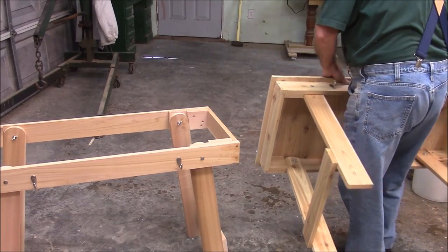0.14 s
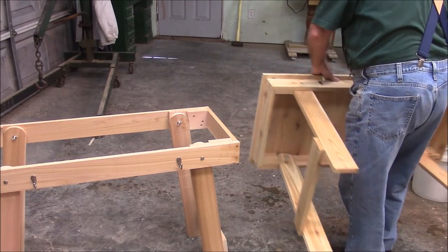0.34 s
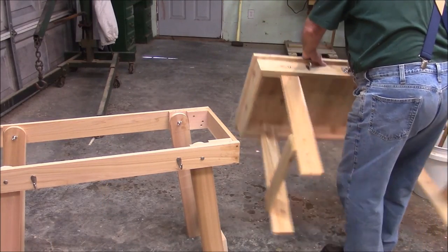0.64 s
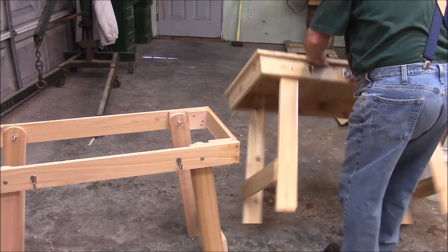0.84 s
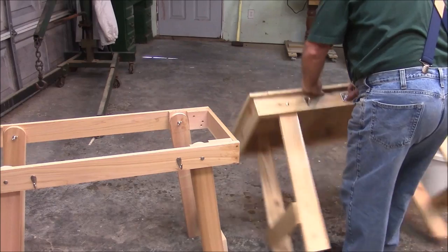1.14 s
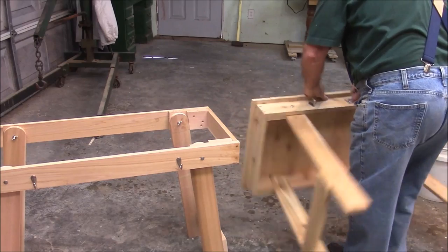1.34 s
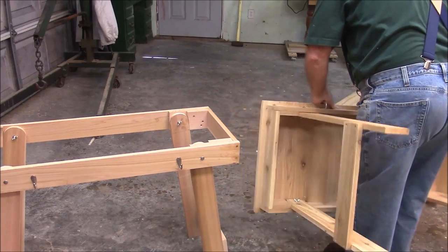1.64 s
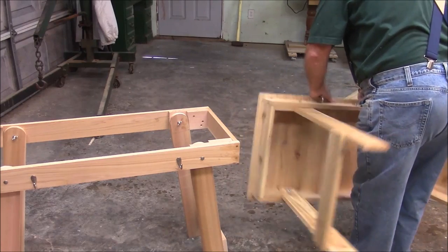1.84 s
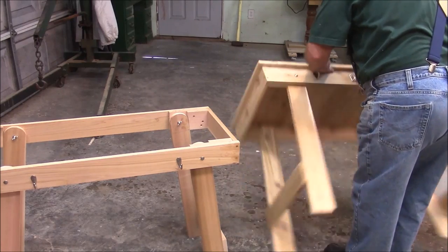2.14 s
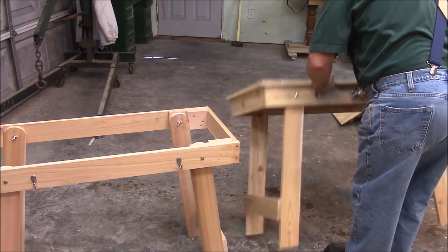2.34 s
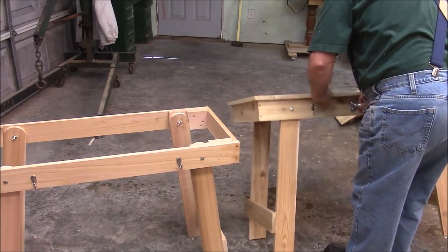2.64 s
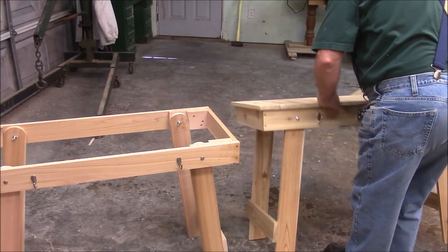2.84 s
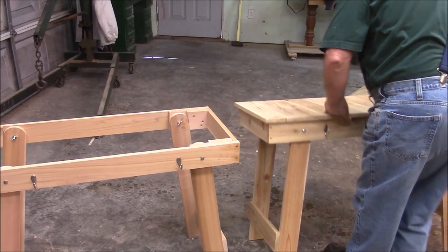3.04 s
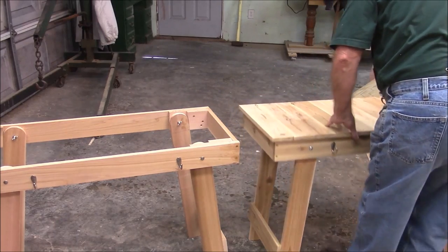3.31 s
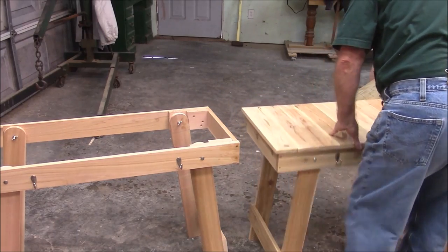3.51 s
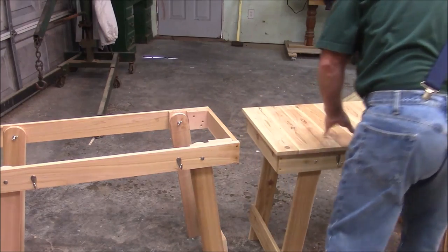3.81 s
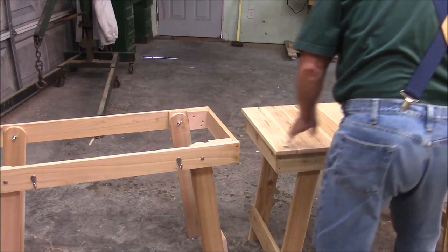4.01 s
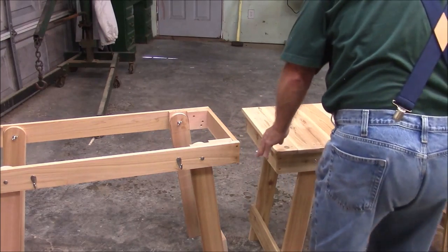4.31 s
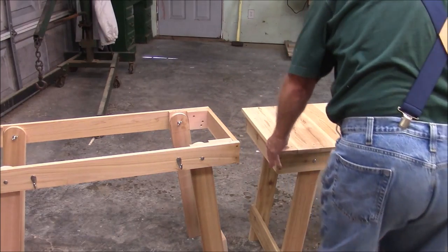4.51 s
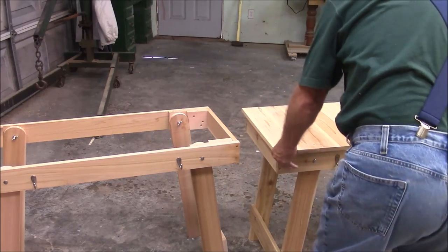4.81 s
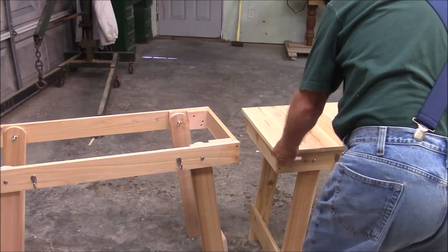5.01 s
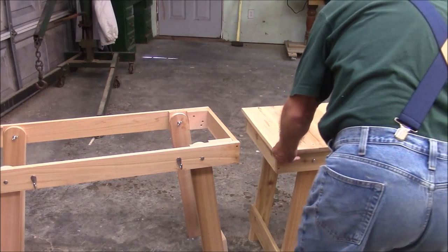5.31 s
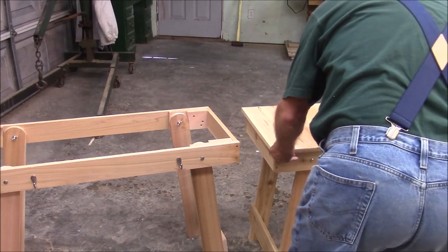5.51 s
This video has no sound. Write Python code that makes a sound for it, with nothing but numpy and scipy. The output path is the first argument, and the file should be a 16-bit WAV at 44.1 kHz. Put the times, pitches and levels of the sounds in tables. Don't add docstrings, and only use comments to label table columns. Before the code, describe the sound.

A low, broad fan drone with a faint unsteady hum runs throughout. In the first 0.4 seconds there are very faint dry hinge squeaks and shoe scuffs. At about 0.86 a wooden brace slaps hard, followed by a quick rattling clatter with hollow board tones until about 1.1. Soft gritty sole scrapes follow around 1.2. At 2.3 to 2.6 comes a louder double clatter: sharp cracks, ringing boards, a bright latch tick and faint hook jingle. After light scuffs, the feet land at 3.5 with a knock and hollow thumps, rocking duller until about 4.2. Gritty shoe strokes rise near 4.2 to 4.3 with a crisp click, then again near 4.9. A tiny knock at 5.3 precedes juddering, groaning stick-slip leg drag from 5.45 to the end. The workshop gives a short woody reverberation; blows are close and compressed.

```python
import sys
import numpy as np
from scipy import signal
from scipy.fft import rfft, irfft, next_fast_len
from scipy.io import wavfile
from scipy.ndimage import uniform_filter1d, minimum_filter1d, map_coordinates

SR = 44100
rng = np.random.default_rng(int(sys.argv[2]) if len(sys.argv) > 2 else 0)


def level_to_linear(level):
    exponent = np.asarray(level, float) / 20
    return 10 ** exponent


def file_out(sig):
    cols = np.atleast_2d(sig).T
    lim = np.clip(cols, -1, 1)
    pcm = np.round(lim * 32767).astype(np.int16)
    wavfile.write(sys.argv[1], SR, pcm)


N = 249606

# (time [s], peak [dB], boom [dB], crack [dB])
BRACE_SLAPS = [(0.858, -1, -6, -5), (0.865, -6, -22, 5), (0.874, -3.5, -9, -25), (0.887, -3.5, -10, -18),
               (0.901, -10, -14, -17), (0.917, -15, -17, 9), (0.933, -13, -11, -28), (0.958, -9, 0, -12),
               (0.974, -20, -14, -23), (0.997, -12, -18, -22), (1.016, -14.5, -21, 6.5),
               (1.027, -26, -18, -18), (1.08, -38, -23, -24), (1.138, -18, -23, -17), (2.3105, 4, -12, -22),
               (2.318, -2, -15, -17.5), (2.345, -6, -19, -22), (2.375, -8, -10, -31),
               (2.3966, 5.5, -7, -30), (2.452, -0.5, -24, -33), (2.474, -7, -17, -38),
               (2.501, -11, -5, -27), (2.518, -19, 4.5, -21), (2.568, -20, -4, -37), (2.584, -21, -7, -23),
               (2.63, -23, -24, -31), (5.336, -19, -22, -31)]
# (time [s], peak [dB], boom [dB], crack [dB])
LEG_JUDDERS = [
    (5.453, -16, -33, -24),
    (5.487, -15, -3, -21),
    (5.552, -11, -20, 5),
]
# (peak time [s], level [dB], fall [s], boom [dB], crack
# [dB])
JOINT_RATTLES = [(.87, -15, 0.34, 1, 2), (.95, -33, 0.14, -3, -14), (2.33, -13.5, 0.12, 0, 2.5),
                 (2.39, -31, 0.048, 17, -11), (2.44, -24, 0.29, 10, -15), (2.49, -20.5, 0.45, -6, -10),
                 (4.771, -24, 0.13, -9, 2)]
# (time [s], peak [dB], pitch [Hz])
AIR_WHACKS = [(0.8574, -2, 554), (2.3102, 4.5, 480), (2.396, -5, 560), (2.451, -4, 450), (3.523, -3, 430),
              (3.628, -5, 330), (3.911, -7, 260), (4.135, -11, 328), (5.454, -9, 480)]
# (loudest time [s], level [dB], pitch [Hz])
BOARD_NOTES = [(.867, -17, 380), (.872, -27, 128), (0.873, -20, 510), (.88, -12, 206), (.893, -11.5, 356),
               (.903, -14, 419), (0.907, -21, 220), (.926, -18, 297), (.935, -18, 139), (.937, -14.5, 382),
               (.944, -16.5, 222), (.963, -16.5, 390), (.965, -20.5, 139), (.972, -18.5, 502),
               (1.003, -17, 366), (1.023, -18, 198), (1.028, -18, 347), (2.323, -15, 460),
               (2.324, -17.5, 379), (2.34, -21, 600), (2.362, -21, 520), (2.334, -18, 228),
               (2.373, -14.5, 310), (2.378, -15, 123), (2.405, -12.5, 417), (2.41, -19, 204),
               (2.42, -10.5, 137), (2.455, -18, 333), (2.457, -14, 158), (2.459, -13, 482),
               (2.475, -14.5, 386), (2.477, -16.5, 180), (2.479, -18.5, 555), (2.503, -14.5, 429),
               (2.522, -9.5, 126.9), (2.53, -17, 353), (2.545, -19, 202), (2.578, -15.5, 411),
               (2.58, -15, 125), (2.606, -20.5, 415), (2.633, -27, 124), (5.464, -14, 421),
               (5.476, -18, 463), (5.493, -11, 356), (5.514, -17, 423), (5.514, -15.5, 252),
               (5.57, -14.5, 235), (5.575, -19, 407), (5.584, -11, 508), (5.598, -16.5, 330),
               (5.608, -20, 420), (5.635, -14.5, 520), (5.654, -7.5, 410)]
# (loudest time [s], level [dB], pitch [Hz])
RAIL_NOTES = [(0.86, -28, 2370), (0.861, -30, 2185), (0.861, -21, 1760), (0.866, -14, 910),
              (.872, -19, 644), (.88, -19, 790), (0.894, -20, 877), (0.895, -19, 699), (0.914, -16, 680),
              (0.922, -26, 1878), (0.923, -29, 1641), (0.933, -23, 667), (0.969, -21, 666),
              (0.983, -28, 840), (1.02, -21, 785), (2.315, -34, 2400), (2.315, -27, 1485),
              (2.316, -24, 1200), (2.317, -16, 1830), (2.318, -15, 877), (2.354, -27, 1680),
              (2.335, -18, 1050), (2.354, -19, 855), (2.363, -28, 1830), (2.379, -17, 910),
              (2.399, -20, 730), (2.402, -11, 1037), (2.41, -18, 1200), (2.429, -23, 980),
              (2.432, -17, 818), (2.448, -21, 694), (2.453, -24, 855), (2.465, -15, 992),
              (2.487, -24, 1001), (2.515, -24, 861), (2.52, -21, 662), (2.532, -23, 992),
              (2.567, -19.5, 757), (2.644, -21.5, 797), (3.528, -22, 893), (3.53, -10, 348),
              (3.633, -21, 738), (3.644, -13, 397), (3.662, -10, 387), (3.681, -15, 420),
              (3.761, -13.5, 350), (3.805, -15, 376), (3.828, -15, 385), (3.931, -14, 417),
              (3.952, -24, 387), (4.139, -17, 436), (5.465, -23, 717), (5.49, -21, 690), (5.557, -24, 2370),
              (5.558, -25, 1640), (5.579, -27, 1650), (5.581, -23, 1060), (5.585, -20, 695),
              (5.615, -24, 3176), (5.615, -21, 700), (5.644, -26, 2420), (5.651, -27, 760)]
# (time [s], peak [dB], boom [dB], crack [dB], boom pitch [Hz])
FOOT_LANDINGS = [(3.523, -5, -17, -9, 151), (3.531, -13, 4, -29, 110), (3.55, -20, -13, -27, 124),
                 (3.628, -7, -3.5, -33, 130), (3.641, -9, 4, -30, 133), (3.6596, -10, 8, -25, 123),
                 (3.6678, -25, 12.5, -34, 123), (3.6753, -23, 12, -34, 123), (3.6841, -24, 10, -34, 125),
                 (3.754, -9, -8, -37, 86), (3.794, -7.5, -0.5, -33, 125), (3.86, -9, 0, -30, 226),
                 (3.91, -10.5, 3.5, -40, 232.6), (3.929, -9.5, 5.5, -32, 127), (3.944, -18, -1, -32, 130.6),
                 (3.962, -45, 6, -29, 128), (4.004, -33, -21, -26, 191), (4.025, -35, 12, -15, 97),
                 (4.134, -8, -2.5, -4, 192), (4.149, -16, -2, -13, 240), (4.169, -17, 1, 4, 128.5)]
# (time [s], level [dB], upper modes [dB])
LEG_DRAG = [(5.449, -40, -14), (5.456, -10, -18), (5.514, -9, -19.5), (5.538, -29, 3), (5.576, -5, -20),
            (5.622, -15, -10), (5.66, -3, -15.5)]
# (peak time [s], level [dB], rise [s], fall [s])
BRACE_BUZZ = [
    (2.316, -23, 0.0074, 0.067),
    (2.365, -29.5, 0.042, 0.069),
    (2.47, -31.5, 0.063, 0.14),
]
# (time [s], peak [dB], pitch [Hz])
GRIT_TICKS = [(0.7397, -33, 7700), (0.819, -38, 3670), (1.128, -20, 3880), (1.4404, -24, 3900),
              (2.3168, -6, 2970), (2.33, -16, 3740), (2.345, -17, 3080), (2.36, -14, 3180),
              (2.3774, -27, 3480), (2.442, 1, 10370), (2.4447, -8, 8860), (2.436, -20, 9000),
              (2.45, -16, 10700), (2.468, -20, 10100), (3.1283, -31, 3800), (3.793, -21, 6720),
              (4.311, -2.5, 6200), (4.315, -3.5, 6500), (.858, -3, 2000), (.859, -8, 2500),
              (0.917, -12, 4800), (.918, -12, 4050), (5.3374, -27, 2980)]
# (time [s], peak [dB], pitch [Hz])
WOOD_CRACKS = [(0.89, -6, 1800), (0.8593, -16, 4500), (2.3113, 0, 1670), (3.524, -16, 2900),
               (3.525, -14, 1800), (3.659, -30, 1700), (2.4405, -15, 2900), (2.7, -18, 1900),
               (0.9173, -11, 3300), (0.97, -7.5, 4900), (0.964, -11, 2430), (.96, -10, 3900),
               (1.0187, -12, 1800), (2.312, -24, 2760), (2.441, -10, 6200), (4.31, -4, 6400),
               (4.316, -8, 6200), (5.457, -19, 2200), (0.8596, -14, 8700), (0.96, -10, 7200),
               (2.312, -20, 7100), (5.551, -27, 2100)]
# (time [s], peak [dB], pitch [Hz])
LATCH_PINGS = [(0.8596, -8, 3750), (.865, -9, 3830), (.872, -12, 3700), (2.328, -13, 3700),
               (2.36, -16, 1830), (2.442, -10, 4200), (2.5, -10, 4140)]
# (peak time [s], level [dB], rise [s], fall [s], bite [Hz])
SOLE_STROKES = [(.06, -49, .15, 0.33, 4700), (.3, -41, 0.85, 0.076, 5530), (.735, -31.5, 0.1, 0.15, 6060),
                (.821, -38, .02, 0.021, 8000), (.868, -26.5, 0.0089, 0.083, 6970),
                (1.04, -42, .03, .05, 7500), (1.179, -19, 0.042, 0.13, 4730),
                (1.245, -19.5, 0.13, 0.21, 5440), (1.44, -29, 0.13, 0.16, 5300),
                (2.325, -30, .012, 0.12, 6800), (2.455, -32.5, .02, 0.22, 6000),
                (2.898, -22.5, 0.17, 0.21, 5300), (3.03, -41, 0.22, 0.43, 3950),
                (3.35, -35, 0.11, .2, 5900), (3.485, -24.5, 0.15, 0.1, 6400),
                (3.65, -28, 0.094, 0.096, 5760), (3.74, -41.5, .1, 0.33, 5640),
                (4.125, -24.5, 0.11, 0.11, 6700), (4.2, -21, 0.034, .05, 3200),
                (4.228, -12, 0.08, 0.1, 4000), (4.319, -14, 0.12, 0.11, 6200), (4.4, -27, 0.09, 0.13, 5000),
                (4.48, -34.5, .1, 0.16, 4600), (4.78, -38.5, 0.21, .1, 5600),
                (4.82, -22, 0.045, 0.091, 6440), (4.875, -16, 0.12, 0.092, 5600),
                (4.95, -19.5, 0.21, 0.17, 6300), (5.12, -33.5, 0.2, 0.18, 5000),
                (5.55, -28, 0.11, .15, 4200), (5.64, -22, 0.18, 0.33, 3660)]
# (peak time [s], level [dB], rise [s], fall [s])
HOOK_JINGLES = [(2.45, -33, .008, 0.068), (2.57, -42, 0.14, 0.087), (2.65, -46, 0.073, .07),
                (5.15, -44, 0.057, 0.081)]
# (time [s], level [dB], chirp [Hz], chirp level [dB])
HINGE_SQUEAK = [(0, -56, 11400, -12), (.05, -45, 11500, -10), (.17, -44, 12300, -9), (.215, -46, 12050, 3),
                (.24, -42, 12000, -14), (.285, -47, 12500, 2), (.32, -47, 11000, 6), (.348, -45, 10400, -1),
                (.37, -75, 10400, -9)]
# (time [s], level [dB])
FAN_LEVEL = [(0, -25.5), (.8, -26.5), (.95, -24), (1.7, -27.5), (2.25, -26.5), (2.46, -22.5), (3.07, -26),
             (3.5, -27), (4, -27), (4.5, -26), (5.66, -26.5)]
# (time [s], level [dB])
BLADE_LEVEL = [(0, -33), (.85, -32), (1.2, -44), (2.3, -33), (3.2, -36), (5.66, -36)]

# (frequency [Hz], width [Hz], level [dB])
TOP_MODES = [(128.5, 20, -8), (196, 22, -5), (235, 29, -3.5), (255, 36, -7)]
FRAME_MODES = [(310, 37, -2), (399, 58, -1), (500, 98, -1), (571, 123, -7.5), (727, 57, -5.5),
               (922, 89, -5.5), (1017, 69, -4.5), (1280, 330, -14.5)]
SLAT_MODES = [(1300, 490, 8), (1700, 270, 15.5), (2600, 450, 12), (2840, 2300, 4), (3870, 360, -3),
              (5300, 14000, 0), (8050, 9300, 0)]
# (frequency [Hz], width [Hz], level [dB])
STANDING_MODES = [(240, 56, -19), (334, 54, -1.5), (388, 47, 0.5), (450, 60, -4.5), (512, 39, -5.5),
                  (745, 135, -5.5), (940, 200, -7)]
# (frequency [Hz], width [Hz], level [dB])
DRAG_LOW_MODES = [(240, 51, -4), (336, 28, 0), (443, 52, 2), (480, 60, -2.5), (520, 70, 4.5),
                  (600, 90, -5.5)]
DRAG_HIGH_MODES = [(704, 96, 1), (1080, 170, -8), (1227, 120, -3), (1690, 200, -6), (2040, 200, -9),
                   (2380, 180, -8), (3230, 110, -15), (3820, 300, -16), (4500, 310, -18),
                   (5760, 550, -16.5)]
# (frequency [Hz], width [Hz], level [dB])
BUZZ_MODES = [(1500, 300, -6), (1850, 130, 2), (2380, 180, -5), (2930, 200, -7), (3680, 300, -8)]
HOOK_MODES = [(8350, 670, -4), (9000, 220, 4), (9500, 220, 1), (10250, 200, 2), (10900, 220, 2),
              (11400, 200, -2), (12400, 250, -1), (13200, 500, -7)]
HINGE_MODES = [(5770, 140, 0), (6200, 85, -1), (8300, 200, -8), (8800, 400, -5), (11800, 1200, -8)]
# (frequency [Hz], level [dB])
DUST_SPECTRUM = [(300, -6), (1000, 3.5), (2000, -5), (3000, 2), (5000, -0.5), (8000, 1.5), (12000, 1.5),
                 (14000, -5.5)]
# (frequency [Hz], density [dB per Hz])
FAN_SPECTRUM = [(21, -50), (35, -14.5), (76, -7.5), (150, -12), (179, -6), (369, -5.5), (398, -9),
                (440, -6), (487, -7), (691, -9), (1620, -22), (1880, -24.5), (7110, -39), (11200, -40.5),
                (14000, -50)]
# (frequency [Hz], T60 [s])
ROOM_T60 = [(100, 0.17), (500, 0.74), (2000, 0.2), (8000, 0.31)]
# (frequency [Hz], response [dB])
TREBLE_RESPONSE = [(13500, 0), (14500, -4), (15100, -17), (15500, -45)]

SLAP_DECAY_S, JUDDER_DECAY_S = 0.0025, 0.0141
RATTLE_RISE_S = 0.016
BOARD_RISE_S, BOARD_FALL_S = 0.014, 0.037
RAIL_RISE_S, RAIL_FALL_S = 0.007, 0.019
PHASE_WANDER_RAD = 0.0071
WHACK_RISE_S, WHACK_T60_S = 0.0015, 0.017
SETTLED_S, ROCK_HZ = 3.65, 480
TICK_T60_S, TICK_ROUGH_RAD = 0.016, 0.22
CRACK_T60_S, CRACK_ROUGH_RAD = 0.037, 0.55
PING_T60_S, PING_ROUGH_RAD = 0.016, 0.07
SHUFFLE_DB, SHUFFLE_HZ = -51, 3570
TOP_TILT_DB, SWELL_TILT_DB = -1.5, 1
SWELL_ROUNDNESS = 1.36
SWING_S, SWING_HALF_S, SAG_PER_S = 2.58, 0.16, 0.32


def unit(x):
    return x / np.sqrt(np.mean(x ** 2) + 1e-20)


def add_at(out, s, sound):
    at = round(s * SR)
    out[..., at:at + sound.shape[-1]] += sound


def along(points, hz):
    f, value = np.transpose(points)
    return np.interp(np.log(hz + 1), np.log(f + 1), value)


def curves(rows, outside=None):
    s, *columns = np.transpose(rows)
    t = np.arange(N) / SR
    return [np.interp(t, s, column, outside, outside) for column in columns]


def wobble(rate_hz):
    knots = rng.standard_normal(int(N * rate_hz / SR) + 4)
    return map_coordinates(knots, [np.arange(N) * rate_hz / SR])


def swells(rows):
    s, db, rise_s, fall_s = np.transpose(rows)[:4, :, None]
    late = np.arange(N) / SR - s
    return level_to_linear(db - 20 * abs(late / np.where(late < 0, rise_s, fall_s)) ** SWELL_ROUNDNESS)


def kicks(rate_hz, spread_db):
    hits = (rng.random(N) < rate_hz / SR) * rng.standard_normal(N)
    return unit(hits * level_to_linear(spread_db * np.minimum(rng.exponential(size=N), 2)))


def patches(depth_db):
    hz, t, z = signal.stft(rng.standard_normal(N), SR, nperseg=256)
    field = uniform_filter1d(rng.standard_normal(z.shape), 5, 0)
    field = uniform_filter1d(field, 12, 1)
    return hz[:, None], t, z * level_to_linear(depth_db * unit(field))


def filtered(x, response):
    m = next_fast_len(N + SR // 4)
    return irfft(rfft(x, m) * response(np.fft.rfftfreq(m, 1 / SR)), m)[:N]


def blunt(x, hz):
    return filtered(x, lambda f: 1 / (1 + 1j * f / hz) ** 2)


def ringing(x, modes):
    def bank(f):
        total = 0
        for k, (center, width, db) in enumerate(modes):
            damping = 1j * f * width
            total = total + (-1) ** k * level_to_linear(db) * damping / (center ** 2 - f ** 2 + damping)
        return total

    return filtered(x, bank) / np.sqrt(np.mean(abs(bank(np.fft.rfftfreq(8192, 1 / SR))) ** 2))


def fitful(x, modes, depth_db, rate_hz):
    total, power = 0, 0
    for k, (center, width, db) in enumerate(modes):
        drive = x * level_to_linear(depth_db * wobble(rate_hz))
        total = total + (-1) ** k * level_to_linear(db) * np.sqrt(width) * ringing(drive, [(center, width, 0)])
        power += level_to_linear(2 * db) * width
    return total / np.sqrt(power)


def braces():
    force, t = np.zeros((3, N + SR)), np.arange(SR // 20) / SR
    contacts = [(*row, SLAP_DECAY_S) for row in BRACE_SLAPS]
    contacts += [(*row, JUDDER_DECAY_S) for row in LEG_JUDDERS]
    for s, db, boom_db, crack_db, decay_s in contacts:
        chatter = rng.standard_normal((3, len(t))) * np.exp(-t / decay_s)
        chatter *= 0.65 / np.linalg.norm(chatter, axis=1, keepdims=True)
        chatter[:, 0] -= 0.95
        levels_db = np.array([[db + boom_db + 21], [db + 17], [db + crack_db + 9]])
        add_at(force, s + 0.0003, level_to_linear(levels_db) * chatter)
    shares_db = [(boom_db - 15, -1.5, crack_db - 9.5) for *_, boom_db, crack_db in JOINT_RATTLES]
    rattle = swells([(s, db, RATTLE_RISE_S, fall_s) for s, db, fall_s, *_ in JOINT_RATTLES])
    force = force[:, :N] + level_to_linear(shares_db).T @ rattle * kicks(rate_hz=4000, spread_db=0.8)
    frame = ringing(force[0], TOP_MODES) + fitful(force[1], FRAME_MODES, depth_db=3, rate_hz=38)
    slats = fitful(force[2], SLAT_MODES, depth_db=1, rate_hz=69)
    return blunt(frame, hz=1830) + blunt(slats, hz=9100)


def whacks():
    out, t = np.zeros(N + SR), np.arange(SR // 20) / SR
    rise = 1 - np.exp(-t / WHACK_RISE_S)
    for s, db, hz in AIR_WHACKS:
        add_at(out, s, level_to_linear(db + 2.5 - 60 * t / WHACK_T60_S) * rise * np.sin(2 * np.pi * hz * t))
    return out[:N]


def boards():
    out, t = np.zeros(N + SR), np.arange(-SR // 20, SR // 10) / SR
    for rows, rise_s, fall_s, lift_db in [(BOARD_NOTES, BOARD_RISE_S, BOARD_FALL_S, 2.5),
                                          (RAIL_NOTES, RAIL_RISE_S, RAIL_FALL_S, 1.5)]:
        shape_db = -20 * abs(t / np.where(t < 0, rise_s, fall_s)) ** 1.25
        for s, db, hz in rows:
            wander = PHASE_WANDER_RAD * np.cumsum(rng.standard_normal(len(t)))
            phase = 2 * np.pi * (hz * t + rng.random()) + wander
            add_at(out, s - 0.05, level_to_linear(db + lift_db + shape_db) * np.sin(phase))
    return out[:N]


def feet():
    landing, rocking, crack, boom = np.zeros((4, N + SR))
    t = np.arange(SR // 5) / SR
    for s, db, boom_db, crack_db, hz in FOOT_LANDINGS:
        for ratio, level_db in [(1, 3.5), (1.47, -3)]:
            fade = level_to_linear(db + boom_db + level_db - 60 * t / 0.088)
            add_at(boom, s, -fade * np.sin(2 * np.pi * hz * ratio * t))
        push = np.exp(-t / 0.0044) * rng.standard_normal((2, len(t))) * 0.16
        push[:, 0] -= 1
        add_at(rocking if s > SETTLED_S else landing, s, level_to_linear(db + 15) * push[0])
        add_at(crack, s, level_to_linear(db + crack_db + 1) * push[1])
    boom = filtered(boom[:N], lambda f: (1j * f / 60 / (1 + 1j * f / 60)) ** 2)
    landed = blunt(ringing(landing[:N], STANDING_MODES), hz=1280)
    rocked = blunt(ringing(rocking[:N], STANDING_MODES), ROCK_HZ)
    return boom + landed + rocked + blunt(ringing(crack[:N], SLAT_MODES), hz=5000)


def drag():
    db, upper_db = curves(LEG_DRAG, outside=-200)
    slips = kicks(rate_hz=2700, spread_db=-1.5)
    lower = fitful(level_to_linear(db - 6) * slips, DRAG_LOW_MODES, depth_db=3, rate_hz=18)
    upper = fitful(level_to_linear(db + upper_db - 0.5) * slips, DRAG_HIGH_MODES, depth_db=3, rate_hz=53)
    return blunt(lower, hz=910) + upper


def buzz():
    return ringing(swells(BRACE_BUZZ).sum(0) * kicks(rate_hz=3500, spread_db=1), BUZZ_MODES)


def ticks():
    out, t = np.zeros(N + SR), np.arange(SR // 10) / SR
    for rows, t60_s, rough_rad in [(GRIT_TICKS, TICK_T60_S, TICK_ROUGH_RAD),
                                   (WOOD_CRACKS, CRACK_T60_S, CRACK_ROUGH_RAD),
                                   (LATCH_PINGS, PING_T60_S, PING_ROUGH_RAD)]:
        for s, db, hz in rows:
            wander = np.cumsum(uniform_filter1d(rng.standard_normal(len(t)), size=5))
            puff = np.sin(2 * np.pi * hz * t + rough_rad * wander)
            puff *= 0.8 + 0.04 * rng.standard_normal(len(t))
            add_at(out, s, level_to_linear(db - 3 - 60 * t / t60_s) * puff)
    return filtered(out[:N], lambda f: (1j * f / 1400) / (1 + 1j * f / 1400) / (1 + 1j * f / 9000) ** 2)


def soles():
    hz, t, z = patches(depth_db=1.9)
    sample_s = np.arange(N) / SR
    power, rest = swells(SOLE_STROKES) ** 2, level_to_linear(2 * SHUFFLE_DB)
    total = abs(uniform_filter1d(power.sum(0), size=400)) + rest
    bite_hz = (np.transpose(SOLE_STROKES)[4] @ power + SHUFFLE_HZ * rest) / (power.sum(0) + rest)
    bite_hz = np.interp(t, sample_s, bite_hz)
    level_db = np.interp(t, sample_s, 10 * np.log10(total))
    swell = np.clip(np.gradient(level_db, t) / 50, -1, 1)
    bite_db = 6.7 * np.exp(-(np.log((hz + 1) / bite_hz) / 0.51) ** 2)
    octaves = np.clip(np.log2((hz + 1) / 6000), -0.4, 1.2)
    tilt_db = (TOP_TILT_DB + SWELL_TILT_DB * swell) * octaves
    color = level_to_linear(along(DUST_SPECTRUM, hz) + bite_db + tilt_db)
    hiss = signal.istft(z * color, SR, nperseg=256)[1][:N]
    hiss /= np.sqrt(abs(uniform_filter1d(hiss ** 2, 4000)))
    return np.sqrt(total) * level_to_linear(0.88 * wobble(60) + 0.66 * wobble(600) - 3) * hiss


def hook():
    shiver = swells(HOOK_JINGLES).sum(0) * rng.standard_normal(N)
    ring = fitful(shiver, HOOK_MODES, depth_db=5, rate_hz=55)
    late = np.clip(np.arange(N) / SR - SWING_S, -SWING_HALF_S, SWING_HALF_S)
    return map_coordinates(ring, [np.arange(N) - SAG_PER_S / 2 * late ** 2 * SR])


def hinge():
    db, chirp_hz, chirp_db = curves(HINGE_SQUEAK)
    chirp = np.sin(2 * np.pi * np.cumsum(chirp_hz + 260 * wobble(500)) / SR)
    chirp *= level_to_linear(chirp_db - 4 + 4.5 * wobble(90))
    return level_to_linear(db) * (ringing(rng.standard_normal(N), HINGE_MODES) + chirp)


def fan():
    noise = signal.istft(patches(depth_db=1.24)[2], SR, nperseg=256)[1][:N]
    drone = unit(filtered(noise, lambda hz: level_to_linear(along(FAN_SPECTRUM, hz))))
    blade = np.sin(2 * np.pi * np.cumsum(407 + 3.5 * wobble(12)) / SR)
    blade *= level_to_linear(curves(BLADE_LEVEL)[0] + 2.8 * wobble(4.39))
    return level_to_linear(curves(FAN_LEVEL)[0] - 1.23 + 0.6 * wobble(4.23)) * drone + blade


def shop(x):
    hz, t, z = signal.stft(rng.standard_normal(SR // 2), SR, nperseg=256)
    decay = level_to_linear(-60 * t / along(ROOM_T60, hz)[:, None])
    tail = signal.istft(z * decay, SR, nperseg=256)[1]
    return signal.fftconvolve(np.pad(x, (300, 0)), tail / np.linalg.norm(tail))[:N]


def scene():
    wood = braces() + drag() + buzz() + ticks() + hook()
    notes = boards() + whacks()
    landing = feet()
    room = shop(level_to_linear(-6.5) * wood + level_to_linear(-9.5) * notes + level_to_linear(-7.5) * landing)
    return (wood + notes + landing + room + soles() + hinge() + fan())[None]


def roll_off(x):
    return signal.sosfilt(signal.butter(12, 15660, fs=SR, output="sos"), x)


def record(dry):
    def band_edges(hz):
        low_cut = (1j * hz / 70) ** 2 / (1 + 1.3j * hz / 70 - (hz / 70) ** 2)
        return level_to_linear(along(TREBLE_RESPONSE, hz)) * low_cut

    heard = filtered(dry[0], band_edges)[None]
    need = np.minimum(1, 0.62 / (abs(heard) + 1e-9))
    gain = minimum_filter1d(need, size=901, origin=450)
    gain = uniform_filter1d(gain, size=161, origin=80)
    held = heard * gain ** 0.63
    rounded = held / (1 + abs(held / 0.92) ** 10) ** (1 / 10)
    return roll_off(rounded)


dry = scene()
out = record(dry)
file_out(out)
```